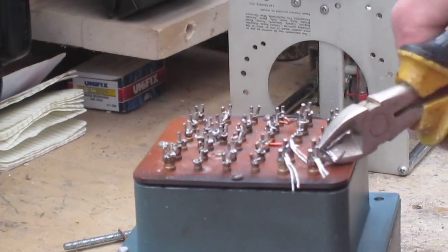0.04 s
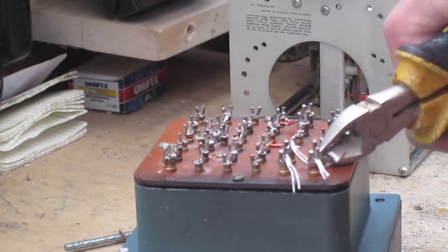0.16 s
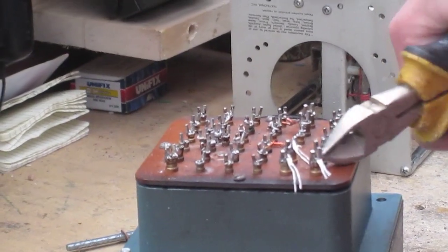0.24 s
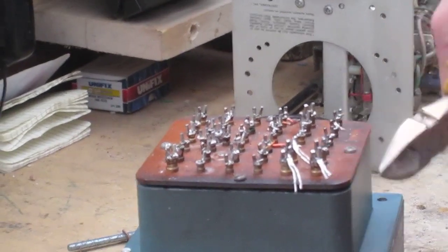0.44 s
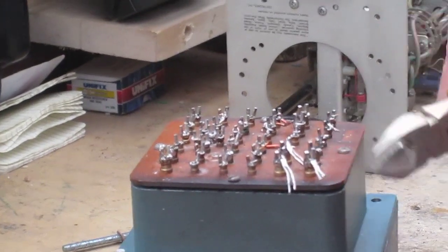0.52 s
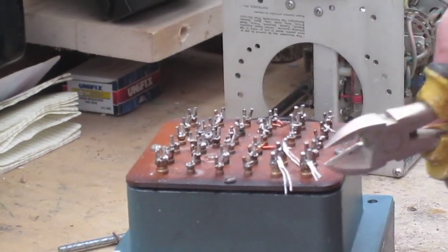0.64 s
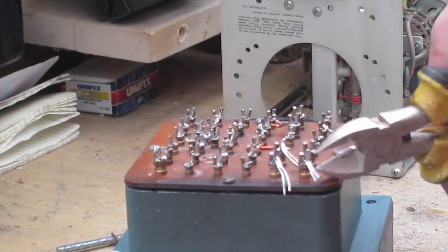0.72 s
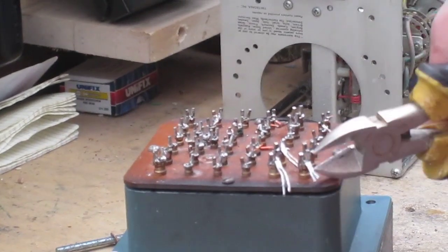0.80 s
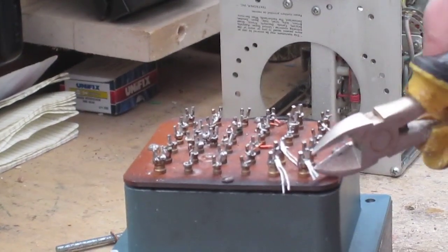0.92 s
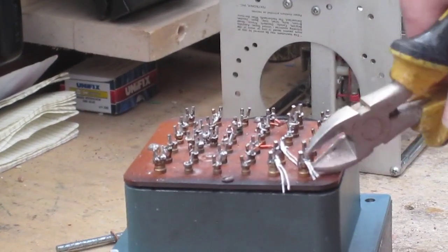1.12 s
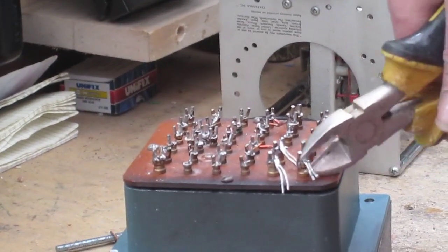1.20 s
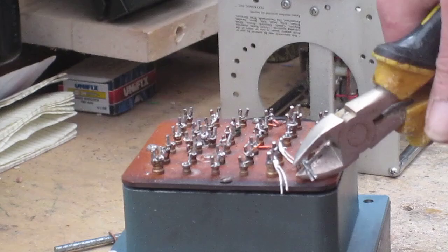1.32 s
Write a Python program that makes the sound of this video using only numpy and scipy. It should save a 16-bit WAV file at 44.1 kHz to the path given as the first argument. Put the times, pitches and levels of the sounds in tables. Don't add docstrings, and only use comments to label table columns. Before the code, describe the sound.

Side cutters snap a wire: faint jaw scrape from the start, a small bite at 0.24 s, then a loud, clipped crack at 0.26 s with short metallic ringing. Faint hinge squeak around 0.6 s, ticks and knocks from 0.7 s, an offcut tinkling at 0.86 s, firmer knocks at 1.04, 1.14 and 1.21 s, soft thuds and scuffs near 1.3 s. Quiet room hiss, handling rumble, thin electronic whine; close microphone.

```python
import sys
import numpy as np
from scipy import signal
from scipy.io import wavfile
from scipy.ndimage import uniform_filter1d

SR = 44100
rng = np.random.default_rng(int(sys.argv[2]) if len(sys.argv) > 2 else 0)


def ratio(d):
    e = np.asarray(d, float) / 20
    return 10 ** e


def wav_record(signal):
    frames = np.transpose(np.atleast_2d(signal))
    bounded = np.clip(frames, -1, 1)
    quanta = np.round(bounded * 32767).astype(np.int16)
    wavfile.write(sys.argv[1], SR, quanta)


N = 59535

SNAP_S = .2583
ROOM_DB, ROOM_LONGER = -15.5, 1.57

# pitch_hz, level_db
SHIVER = [(270, -12), (520, -19.5), (880, -12), (1300, -18.5), (1880, -3), (2800, -14.5), (5200, -10),
          (12000, -17)]


def evened(x):
    return x / np.sqrt(np.mean(x ** 2) + 1e-20)


def read(points, hz):
    f, value = np.transpose(points)
    return np.interp(np.log(hz + 1), np.log(f + 1), value)


def add(mix, start_s, sound):
    part = mix[round(start_s * SR):][:len(sound)]
    part += sound[:len(part)]


def modes(table, size=6000):
    hz, db, t60 = np.transpose(table)[:, :, None]
    t = np.arange(size) / SR
    swell = np.minimum(t * hz / 2.0, 1)
    return ratio(db - 60 * t / t60) * np.sin(2 * np.pi * hz * t) * swell


def shiver(colour, tilt_db=0., shorter=0.93, count=700, size=6500):
    # pitch_hz, t60_s
    panel_decay = [(200, 0.27), (600, 0.19), (1800, 0.12), (4000, .13), (10000, 0.1), (16000, 0.064)]
    u = rng.random((count, 3))
    hz = 150 + 16000 * ((np.arange(count) + u[:, 0]) / count) ** 2
    db = read(colour, hz) + 10 * np.log10(np.sqrt(hz)) + tilt_db * np.log2(hz / 1000) / 3
    t60 = shorter * read(panel_decay, hz) * (0.71 + .6 * u[:, 1])
    t = np.arange(size) / SR
    decay = ratio(db[:, None] - 60 * t / t60[:, None])
    swell = np.minimum(t * hz[:, None] / 2.32, 1)
    x = (decay * swell * np.sin(2 * np.pi * (hz[:, None] * t + u[:, 2:]))).sum(0)
    return x / np.sqrt(np.mean(x[:600] ** 2))


def coloured(colour, patchy_db):
    frames, hz = N // 256 + 5, np.fft.rfftfreq(1024, 1 / SR)
    a, b, patches = rng.standard_normal((frames, 513, 3)).T
    patches = evened(uniform_filter1d(uniform_filter1d(patches, 10, 0), 8, 1))
    z = (a + 1j * b) * ratio(read(colour, hz)[:, None] + patchy_db * patches)
    return evened(signal.istft(z, nperseg=1024, noverlap=768)[1][:N])


def fuzz(hz, width, size):
    pole = np.exp(-np.pi * width / SR)
    z = rng.standard_normal((size, 2)) @ [1, 1j]
    for _ in range(2):
        z = signal.lfilter([1], [1, -pole], z)
    turns = np.cumsum(hz * np.ones(size)) / SR
    return evened((z * np.exp(2j * np.pi * turns)).real)


def crack(table):
    x = np.zeros(6000)
    for *mode, delay_ms in table:
        add(x, delay_ms / 1000, modes([mode])[0])
    return x / abs(x).max()


def snap():
    # pitch_hz, level_db, t60_s, delay_ms
    crack_modes = [(9700, 0, .003, 0), (4850, -10, .005, .7), (3850, -15, .008, .6), (1810, -4, .011, .05),
                   (890, -18, .025, .3), (6200, -14, .006, .3), (8900, -18, .007, 3), (11000, -4, .003, 0),
                   (2900, -17, .004, .2)]
    # pitch_hz, level_db, t60_s
    snap_box = [(290, -12, .07), (678, -8, .15), (905, -6, .06), (1605, -6, .06), (1707, 0, .06),
                (1884, 6, .1), (2040, -1, .08), (2110, -8, .17), (2455, -8, .074), (3790, -10, .1),
                (4436, -10, .09), (4883, -8, .08), (5044, -9, .08), (5464, -6, .07)]
    break_up = ratio(1.5) * crack(crack_modes) + ratio(-25) * modes(snap_box).sum(0)
    bench = ratio(ROOM_DB) * shiver(SHIVER, -4.0, ROOM_LONGER, count=500)
    return break_up, ratio(-18.5) * (shiver(SHIVER) + bench)


def bite():
    # pitch_hz, level_db, t60_s, delay_ms
    bite_modes = [(8800, -3, .0035, 0), (3000, 0, .0045, .2), (1700, -11, .02, .3), (1050, -16, .008, .3),
                  (4900, -16, .005, .1), (14500, -13, .002, 0)]
    return ratio(-9) * crack(bite_modes)


def tick(peak_db, edge_db, ring_db, contact_ms):
    # pitch_hz, level_db, t60_s
    jaw_modes = [(1715, -7, 0.018), (1996, -7, 0.0095), (2460, -4, 0.0034), (2980, 13.5, 0.003),
                 (4800, -12, .005), (8660, 2, 0.003), (10000, -9, .003), (14630, -4, 0.0018)]
    hz, push = np.transpose(jaw_modes)[0], np.zeros(300)
    slips = np.array([0, .45, 1]) + 0.22 * rng.random(3)
    places = np.minimum(slips * contact_ms * SR / 1000, 299).astype(int)
    np.add.at(push, places, [.4, .6, 1])
    weights = ratio(edge_db * (hz > 4000) + ring_db * (hz < 2300)) * np.sign(hz - 2300)
    x = np.convolve(push, weights @ modes(jaw_modes, size=2000))
    return ratio(peak_db) * x / abs(x).max()


def jaws():
    # start_s, peak_db, edge_db, handle_ring_db, contact_ms
    ticks = [(.2065, -45.5, 7.5, -15, 0.25), (.434, -61, 13, -5.5, 0.23), (0.4638, -46, -11, 16.5, 0.44),
             (0.5202, -36, -15, -8, 0.33), (0.6861, -38.5, -10.5, -2, 1.255), (0.7796, -41.5, -7, 9, .4),
             (0.7966, -29.5, 8, 14, .4), (0.802, -35, 4, 18, 0.37), (0.8101, -21.5, -1.5, 1, .3),
             (0.941, -58, 12, -18.5, 0.17), (0.9474, -42.5, 4, -1.5, .5), (1.0402, -24, -9, -10, 0.21),
             (1.2487, -37, -1.5, -14, .4)]
    out = np.zeros(N)
    add(out, .2395, bite())
    for start_s, *touch in ticks:
        add(out, start_s, tick(*touch))
    echo = shiver([(150, 6.0), (2000, 3), (16000, -29)])
    return out + ratio(-26.5) * signal.oaconvolve(out, echo / np.linalg.norm(echo))[:N]


def knock(peak_db, hz, rattle_db, tilt_db):
    # pitch_hz, level_db, t60_s
    box_modes = [(320, -11, 0.13), (677, 1, 0.16), (817, 1, 0.084), (892.3, 2.5, 0.087), (989, 2.5, 0.046),
                 (1072, -3.5, 0.058), (1185, -9, 0.057), (1498, 1, 0.078), (1883, 10.5, 0.042),
                 (2650, -3.5, 0.096), (3060, 2.5, 0.057), (3390, -11, 0.1), (4540, -7, .04)]
    # pitch_hz, level_db
    rattle_colour = [(150, -13), (330, -3.5), (600, -11), (950, -0.5), (1400, -11), (2200, -9.5),
                     (4400, -20.5), (16000, -30)]
    octaves = abs(np.log2(np.transpose(box_modes)[0] / hz))
    share = ratio(np.maximum(-25.5 * octaves, -17.5))
    body = share @ modes(box_modes, size=5000)
    body = body + modes([(hz, 4, 0.038)], size=5000)[0]
    rattle = shiver(rattle_colour, tilt_db, 0.88, count=160, size=5000)
    return ratio(peak_db) * (body / abs(body).max() + ratio(rattle_db) * rattle)


def knocks():
    # start_s, peak_db, pitch_hz, rattle_db, brightness_db
    blows = [(0.7086, -34, 974, -12.5, -1), (0.721, -35, 978, -15.5, -9), (.736, -40, 1035, -16.5, -8),
             (0.753, -45, 1015, -16, -9.5), (0.9026, -35.5, 970, -17, 5.5), (0.9123, -40, 1030, -11.5, -9),
             (.932, -40, 1015, -10, -14), (1.0399, -32, 1770, -1.5, 5), (1.0424, -24, 897, -13, -3),
             (1.057, -36.5, 690, -9.5, 8.5), (1.1426, -25.5, 956, -11.5, -6.5),
             (1.158, -38.5, 1000, -7.5, -16), (1.2147, -27.5, 1027, -9.5, -4.5),
             (1.230, -34.5, 970, -9, -9), (1.243, -35, 1044, -10, -5), (1.2886, -34.5, 923, -10, -5.5)]
    out = np.zeros(N)
    for start_s, *blow in blows:
        add(out, start_s, knock(*blow))
    return out


def ring():
    # pitch_hz, level_db, t60_s
    offcut_modes = [(1168, -9, .15), (1873, -8, .12), (2350, -11, .08), (4000, -11, .12), (4790, -5, .06),
                    (5150, -7, .06), (8490, 0, .065), (10060, -15, .16), (12120, 4, .11), (12840, -5, .08),
                    (13180, -5, .09)]
    waver = rng.standard_normal((len(offcut_modes), 6000))
    waver = evened(uniform_filter1d(uniform_filter1d(waver, size=120), size=90))
    chatter = 1 + 0.4 * waver * np.minimum(np.arange(6000) / 400, 1)
    lines = (modes(offcut_modes) * chatter).sum(0)
    return ratio(-39.5) * lines + ratio(-49) * shiver(SHIVER, 1.7, size=6000)


def thuds():
    # start_s, level_db, pitch_hz, t60_s
    landings = [
        (.458, -35, 143, 0.055),
        (0.9495, -26.5, 255, 0.084),
        (1.242, -32, 300, 0.053),
        (1.304, -26, 307, 0.056),
        (1.2, -43, 307, .07),
    ]
    out = np.zeros(N)
    for start_s, level_db, hz, t60 in landings:
        add(out, start_s, ratio(level_db) * modes([(hz, 0, t60)])[0])
    return out


def scuff(length_s, level_db, hz):
    t = np.arange(3000) / SR
    grit = ratio(3.4 * uniform_filter1d(rng.exponential(1, 3000), size=20) * 2)
    hiss = evened(grit * fuzz(hz, 1.37 * hz, 3000))
    return ratio(level_db - 20 * (t / length_s) ** 2) * hiss * np.minimum(t / 0.00077, 1)


def scuffs():
    # start_s, length_s, level_db, centre_hz
    drags = [
        (0.683, 0.013, -50.5, 3476),
        (1.135, 0.0075, -46.5, 10000),
        (1.14, 0.0077, -44, 2480),
        (1.274, 0.021, -52.5, 9120),
        (1.304, 0.0253, -46.5, 3247),
        (1.31, 0.0088, -52.5, 8610),
        (0.805, 0.016, -47, 6826),
    ]
    out = np.zeros(N)
    for start_s, *drag in drags:
        add(out, start_s, scuff(*drag))
    return out


def scrape():
    # centre_hz, width_hz, level_db
    scrape_bands = [(2057, 300, 0.5), (4080, 260, -1), (3040, 600, -8), (6070, 3200, -11.5)]
    end_s, sag, fade_db = 0.2, 0.08, -7.5
    t = np.arange(N) / SR
    u = np.minimum(t / end_s, 1)
    x = np.zeros(N)
    for hz, width, db in scrape_bands:
        x += ratio(db + fade_db * u * hz / 4000) * fuzz(hz * (1 + sag * (.5 - u)), width, N)
    return ratio(-53.5 - 300 * np.maximum(t - end_s, 0)) * x


def hinge():
    # time_s, pitch_hz, level_db
    squeak_path = [
        (.535, 2130, -72),
        (.562, 2340, -61),
        (.585, 2410, -62),
        (.612, 2510, -61),
        (.67, 2480, -63),
        (.69, 2450, -82),
    ]
    # start_s, length_s, pitch_hz, level_db
    spring_peeps = [
        (.35, 0.065, 3200, -77.5),
        (.485, 0.055, 3200, -71.5),
        (.593, 0.044, 3205, -69.5),
        (.71, 0.021, 3195, -70),
        (.875, 0.068, 3200, -78),
        (.99, 0.028, 3200, -70),
        (.812, 0.017, 3650, -58.5),
        (.815, 0.024, 4300, -73),
    ]
    t, (s, hz, db) = np.arange(N) / SR, np.transpose(squeak_path)
    pitch = np.interp(t, s, hz)
    tone = np.sin(2 * np.pi * np.cumsum(pitch) / SR)
    out = ratio(np.interp(t, s, db, -120, -120)) * (tone + .25 * fuzz(pitch, 40, N))
    for start_s, length_s, hz, db in spring_peeps:
        u = np.arange(0, length_s, 1 / SR)
        fade = np.minimum(np.minimum(u, length_s - u) / 0.0085, 1)
        add(out, start_s, ratio(db + 5) * np.sin(2 * np.pi * hz * u) * fade)
    return out


def rumble():
    # pitch_hz, level_db
    rumble_colour = [(15, 8.5), (30, 8), (55, -2), (300, -12.5), (700, -14.5), (4000, -41.5)]
    # time_s, level_db
    effort = [
        (0, -41),
        (0.251, -43),
        (0.4, -47.5),
        (.46, -41),
        (.62, -52.5),
        (.9, -46.5),
        (1.08, -44),
        (1.35, -38.5),
    ]
    s, db = np.transpose(effort)
    return ratio(np.interp(np.arange(N) / SR, s, db) - 2.0) * coloured(rumble_colour, 1.8)


def air():
    # pitch_hz, level_db
    air_colour = [(20, -3), (300, -15), (700, -35.5), (2500, -33.5), (5000, -43), (10500, -53.5),
                  (13000, -46.5), (16000, -49)]
    return ratio(-48) * coloured(air_colour, 1.5)


def whine():
    line_hz, frame_s, first_blip_s, blip_ms = 7867.1, 1 / 29.97, .0113, 1.15
    t = np.arange(N) / SR
    picture, u = np.divmod(t - first_blip_s, frame_s)
    u = u * 1000 / blip_ms
    body = ratio(-73) * (1 - 2 * np.exp(-u / 2)) - 1j * ratio(-57.5) * u * np.exp(1 - u)
    return ((-1) ** picture * body * np.exp(2j * np.pi * line_hz * t)).real


def gain_control():
    duck_db, back_s = -3.5, 0.294
    since = np.arange(N) / SR - SNAP_S
    return ratio(duck_db * (since > 0) * np.exp(-np.maximum(since, 0) / back_s))


def scene():
    mix = np.zeros(N)
    for part in snap():
        add(mix, SNAP_S, part)
    mix += jaws() + knocks()
    add(mix, .8563, ring())
    mix += thuds() + scuffs() + scrape() + hinge()
    return (mix + gain_control() * (rumble() + air() + whine()))[None]


def top_cut(x):
    return signal.sosfilt(signal.butter(12, 15800, fs=SR, output="sos"), x)


def record(dry):
    # pitch_hz, level_db
    top_curve = [(20, 0), (10500, -1.5), (13000, -14.5), (16000, -15), (22050, -13)]
    hz = np.linspace(0, SR / 2, 257)
    doubled = signal.firwin2(255, hz, ratio(2 * read(top_curve, hz)), fs=SR)
    dulling = signal.minimum_phase(doubled, n_fft=4096)
    return top_cut(np.clip(signal.lfilter(dulling, [1], dry), -1, 1))


dry = scene()
out = record(dry)
wav_record(out)
```